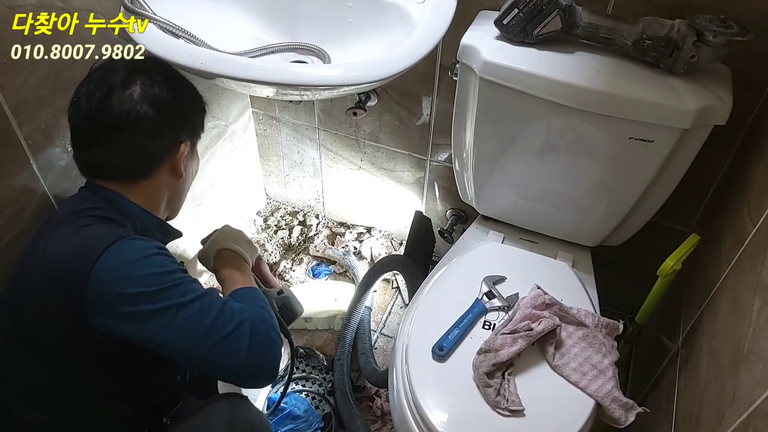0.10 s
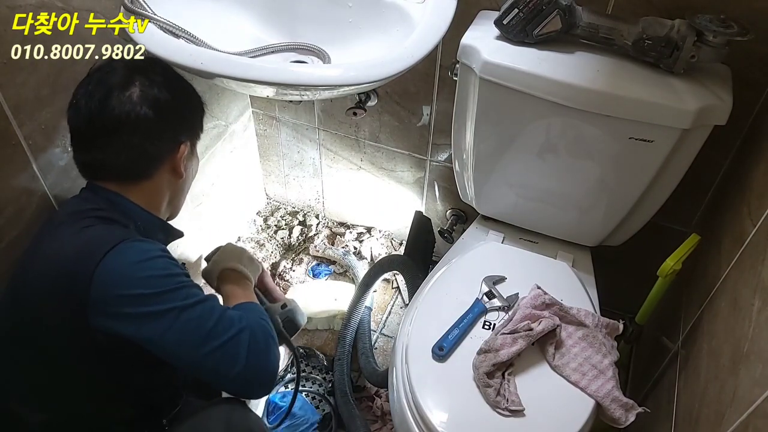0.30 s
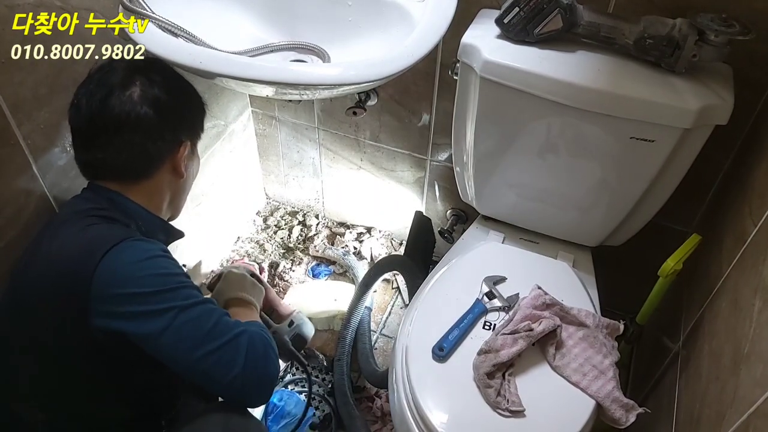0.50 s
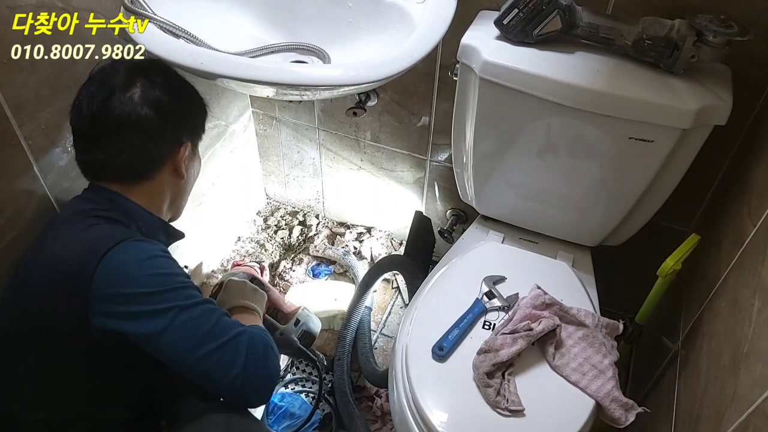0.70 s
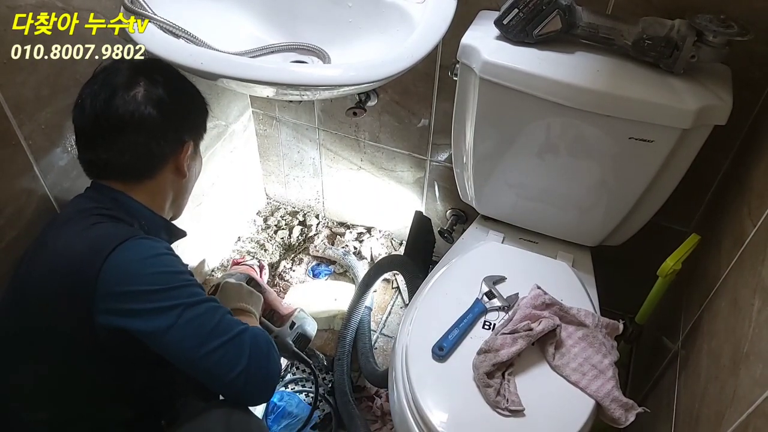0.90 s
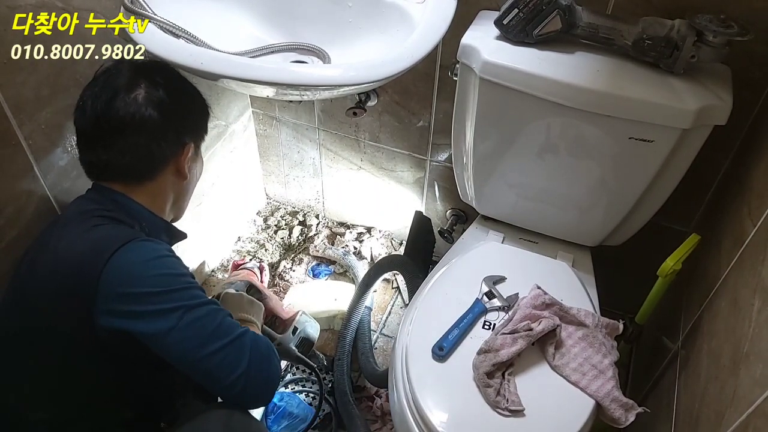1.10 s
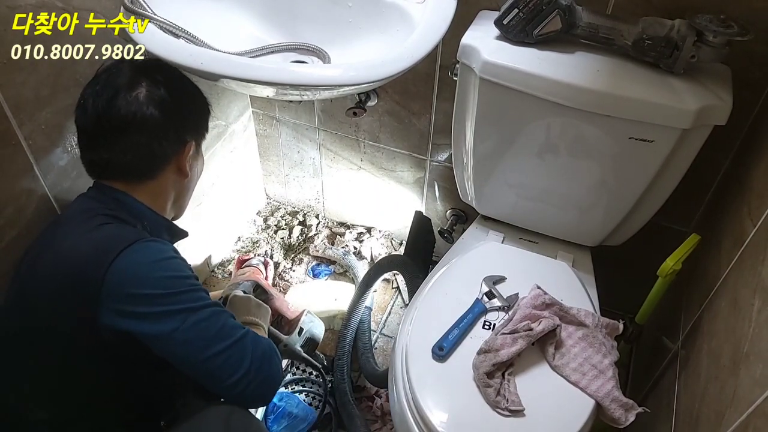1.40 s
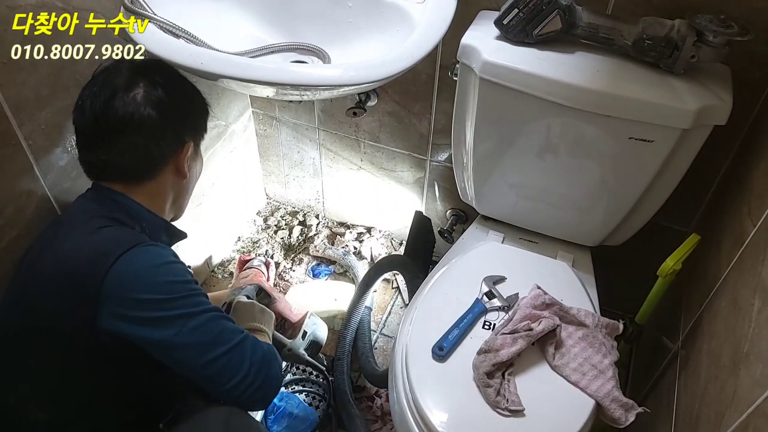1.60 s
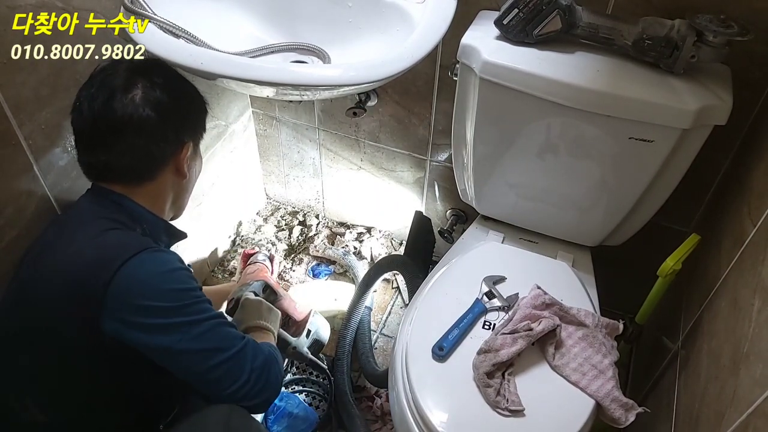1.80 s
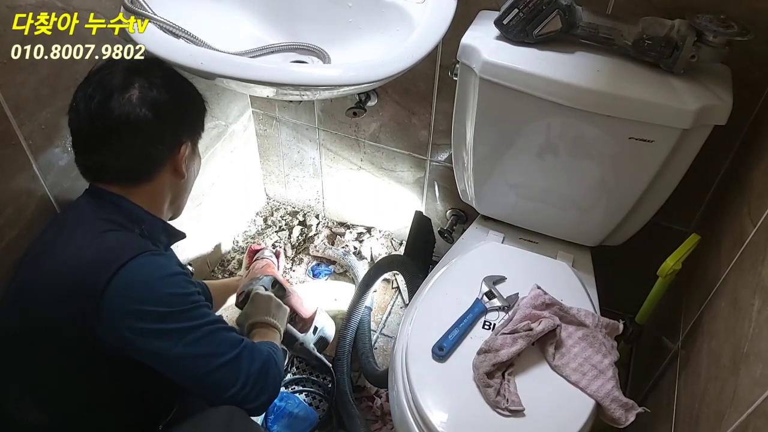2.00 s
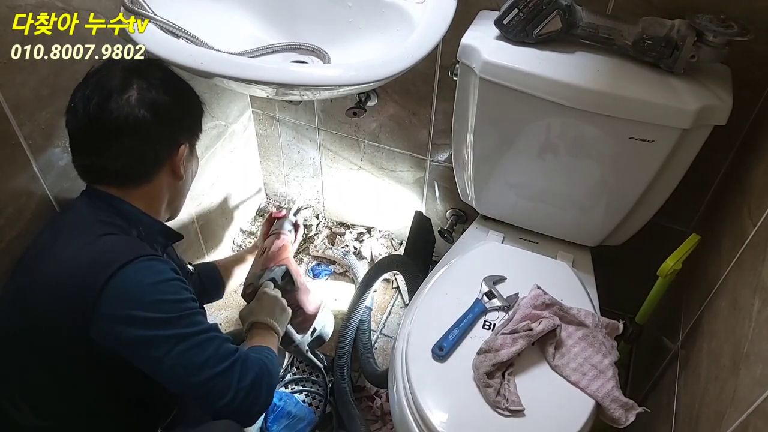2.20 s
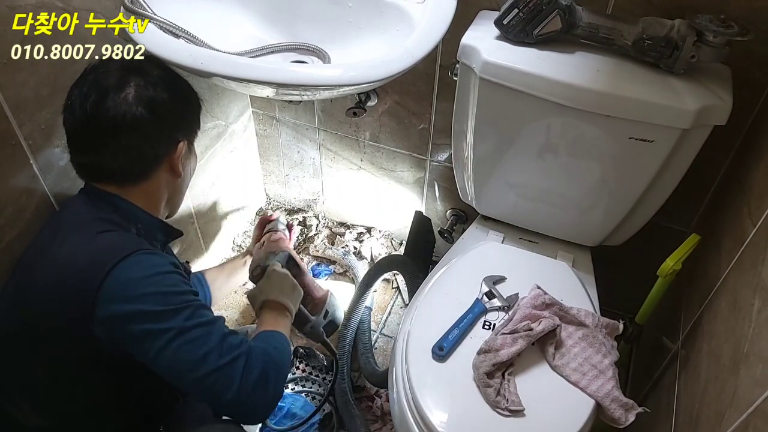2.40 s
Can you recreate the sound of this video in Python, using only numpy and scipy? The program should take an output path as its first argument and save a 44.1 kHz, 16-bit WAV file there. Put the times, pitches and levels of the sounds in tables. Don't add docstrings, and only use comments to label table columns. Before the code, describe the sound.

Electric chipping hammer in a small tiled bathroom: a brief motor whir, then rapid ringing steel blows crushing mortar for about two seconds, then the blows stop and the motor slows; close, loud, bright stereo pickup.

```python
import sys
import numpy as np
from scipy import signal
from scipy.io import wavfile
from scipy.ndimage import uniform_filter1d

SR = 44100
rng = np.random.default_rng(int(sys.argv[2]) if len(sys.argv) > 2 else 0)


def ratio_of_db(decibels):
    return 10 ** (np.asarray(decibels, float) / 20)


def unload_audio(sound):
    columns = np.transpose(np.atleast_2d(sound))
    steps = np.round(np.clip(columns, -1, 1) * 32767)
    wavfile.write(sys.argv[1], SR, steps.astype(np.int16))


N = 110250


def rms_one(x):
    return x / np.sqrt(np.mean(x ** 2) + 1e-20)


def noise():
    return rng.standard_normal((2, N))


def in_time(rows):
    s, *columns = np.transpose(rows)
    return [np.interp(np.arange(N) / SR, s, column) for column in columns]


def drift(rate):
    r = np.exp(-80 * np.pi * rate / SR)
    slow = signal.lfilter([1], [1, -2 * r, r * r], rng.standard_normal(N // 40 + 2002))
    slow = rms_one(slow[2000:])
    return np.interp(np.arange(N) / 40, np.arange(len(slow)), slow)


def rings(clicks, modes):
    out = 0
    for hz, db, t60 in modes:
        r = ratio_of_db(-60 / (t60 * SR))
        w = 2 * np.pi * hz / SR
        ring = signal.lfilter([1], [1, -2 * r * np.cos(w), r * r], clicks + 1e-18)
        out = out + ratio_of_db(db) * rms_one(ring)
    return out


def grains(per_s, spread_db):
    sizes = ratio_of_db(spread_db * np.minimum(rng.exponential(1, (2, N)), 5)) * noise()
    return rms_one(sizes * (rng.random((2, N)) < per_s / SR))


def coloured(source, spectrum, patchy_db, per_octave=3):
    hz, db = np.transpose(spectrum)
    edges = 30 * 2 ** np.arange(0, 9.2, 1 / per_octave)
    edges = edges[edges > hz[0] * .7]
    lumps_db = 1.5 * drift(9)
    out = 0
    for low, high in zip(edges, edges[1:]):
        band = signal.sosfilt(signal.butter(2, [low, high], "band", fs=SR, output="sos"), source)
        level_db = np.interp(np.log(low * high) / 2, np.log(hz), db)
        flicker_db = patchy_db * drift(38.0) + (high < 300) * lumps_db
        out = out + band * ratio_of_db(level_db + flicker_db)
        source = source[::-1] * [[1], [-1]]
    return rms_one(out)


def pulsing(swell, share, span):
    return 1 - share + share * swell / uniform_filter1d(swell, size=span)


# f/Hz, level/dB per Hz
MOTOR_RUSH = [(40, -25), (150, -17), (377, -27), (460, -6), (810, -9), (3550, -4), (8000, -19.5),
              (15500, -21)]
# t/s, f/Hz, hum level/dB, whine level/dB
ROTOR_SPEED = [
    (0, 471, -46, -50),
    (.22, 471, -46, -56),
    (.35, 440, -58, -60),
    (2.2, 530, -65, -52),
    (2.3, 495, -62, -39),
    (2.5, 375, -62, -38),
]
# f/Hz, level/dB, t60/s
CASING_MODE = [(820, 0, .2)]


def motor():
    rush_db, casing_db = -34.5, -47
    hz, hum_db, whine_db = in_time(ROTOR_SPEED)
    turn = 2 * np.pi * np.cumsum(hz * (1 + .004 * drift(15.0))) / SR
    tones = 0
    for multiple, db in ((1, hum_db), (4, whine_db)):
        sides = np.sin([multiple * turn, multiple * turn + 1.5])
        tones = tones + ratio_of_db(db + 3 * drift(20)) * sides
    rush = ratio_of_db(rush_db) * coloured(noise(), MOTOR_RUSH, patchy_db=3.0)
    return rush + tones + ratio_of_db(casing_db) * rings(noise(), CASING_MODE)


# t/s, ring level/dB
SHANK_BLOWS = [(0.175, -25.5), (0.213, -19.5), (0.2376, -22), (0.2625, -16.5), (0.288, -15), (0.3125, -11),
               (0.3363, -8.5), (0.3587, -15), (0.3805, -14), (0.395, -8), (0.428, -12.5), (0.461, -13),
               (0.4816, -11.5), (0.5075, -10.5), (0.533, -6), (0.591, -9), (0.629, -8), (0.667, -10),
               (0.7096, -19.5), (0.747, -9), (0.781, -10),
               (0.818, -7.5), (0.837, -12), (0.8505, -5), (0.8737, -11), (0.9035, -10), (0.9271, -12),
                (0.9665, -12), (0.996, -9.5), (1.0375, -14.5), (1.0856, -16), (1.123, -15.5), (1.162, -15),
                (1.176, -27), (1.202, -13), (1.2394, -14), (1.2633, -17), (1.283, -22), (1.3014, -15),
                (1.3356, -16), (1.3605, -11), (1.3766, -17.5), (1.402, -18), (1.434, -13), (1.478, -13),
                (1.5043, -15), (1.5347, -14.5),
               (1.57, -17), (1.5943, -15.5), (1.6344, -13.5), (1.6531, -57), (1.675, -17), (1.712, -19),
              (1.7317, -22), (1.747, -12), (1.7786, -12), (1.8007, -13), (1.821, -7), (1.859, -9.5),
              (1.8821, -7.5), (1.901, -19), (1.921, -2), (1.957, -11.5), (1.994, -11.5), (2.038, -13),
              (2.0734, -16.5), (2.101, -15.5), (2.1305, -13), (2.1575, -13), (2.188, -17), (2.215, -16.5),
              (2.2582, -47), (2.2892, -55)]


def all_blows():
    return SHANK_BLOWS


def blows(rise_s):
    s, db = np.transpose(all_blows())
    hits = np.zeros(N)
    hits[(s * SR).astype(int)] = ratio_of_db(db)
    r = np.exp(-1 / (rise_s * SR))
    peak_gain = np.e ** 2 * (1 - r) ** 2 / 2
    return abs(signal.lfilter([peak_gain], np.poly([r, r, r]), hits))


def steel(strikes, hz, wander_hz, rise_s, hold_s):
    lead_s, reset_s = .003, 0.00072
    s, db = np.transpose(sorted([(0, -80)] + strikes))
    t = np.arange(N) / SR + lead_s
    last = np.searchsorted(s, t, side="right") - 1
    age = t - s[last]
    start = ratio_of_db(db) * np.exp(2j * np.pi * rng.random(len(s)))
    swing = start[last] * (1 - np.exp(-age / rise_s)) * np.exp(-(age / hold_s) ** 2)
    r = np.exp(-1 / (reset_s * SR))
    swing = signal.lfilter([1 - r], [1, -r], swing)
    turn = 2 * np.pi * np.cumsum(hz + wander_hz * drift(31.8)) / SR
    apart = .72 + .22 * drift(20.0)
    ring = swing * np.exp(1j * np.array([turn + apart, turn - apart]))
    return np.sqrt(2) * ring.real


# t/s, ring level/dB
BENDING_BLOWS = [(0.4909, -31), (0.557, -34), (0.5901, -19), (0.6545, -30), (0.7064, -21.5), (0.7478, -17),
                 (0.8016, -13.5), (0.8445, -24), (0.872, -24), (0.8944, -20), (0.9274, -26), (0.9738, -14),
                 (1.0025, -9.5), (1.0296, -16), (1.0565, -12.5), (1.102, -13), (1.1239, -17), (1.163, -10),
                 (1.1992, -15), (1.2247, -15), (1.2581, -13), (1.2786, -20), (1.323, -33), (1.3479, -25),
                 (1.3858, -29), (1.4482, -35), (1.4756, -17), (1.5335, -21), (1.5639, -24), (1.5973, -10),
                 (1.6462, -26), (1.673, -15), (1.713, -11), (1.759, -11.5), (1.8039, -22), (1.8523, -28),
                 (1.8772, -20), (1.9081, -25), (1.9426, -33), (1.9695, -24), (2.0009, -26), (2.1087, -23),
                 (2.1635, -24), (2.197, -21), (2.2229, -28)]
# t/s, ring level/dB
TIP_SLIPS = [
    (1.395, -15),
    (1.995, -18),
    (2.02, -11),
]


def shank():
    rise_s, bend_hold_s, bend_wander_hz = 0.011, 0.018, 15.4
    lengthwise = steel(all_blows(), 11756, 9.7, rise_s, 0.019)
    bent = steel(BENDING_BLOWS, 9142, bend_wander_hz, 0.0033, bend_hold_s)
    slipping = steel(TIP_SLIPS, 11110, bend_wander_hz, rise_s, bend_hold_s)
    return ratio_of_db(4) * lengthwise + ratio_of_db(-1.5) * bent + slipping


# f/Hz, level/dB, t60/s
RATTLE_MODES = [(11750, 0, .03), (11400, -6, .03), (11120, -8, .05), (11550, -5, .012), (11950, -9, .012),
                (13800, -4, .015), (14000, -8, .008), (14300, -7, .008)]
# f/Hz, level/dB per Hz
STEEL_HASH = [(3000, -2.5), (6000, -8), (9000, 1), (11700, -10), (12500, 23), (13300, -34), (14000, -9),
              (15200, -26)]


def chatter():
    modes_db, hash_db, hash_follows = -29, -25.5, 0.45
    swell = rms_one(blows(rise_s=0.0099))
    clicks = grains(per_s=1700, spread_db=1.5)
    sizzle = swell ** hash_follows * (noise() + .7 * clicks)
    return (ratio_of_db(modes_db) * rings(swell * clicks, RATTLE_MODES)
            + ratio_of_db(hash_db) * coloured(sizzle, STEEL_HASH, patchy_db=3, per_octave=10))


# t/s, peak level/dB
TIP_BITES = [(0.2243, -29), (0.3395, -26), (0.3705, -19), (0.3955, -12), (0.4274, -10), (0.4547, -10),
             (0.4672, -11), (0.494, -7), (0.525, -7), (0.559, -4.5), (0.5905, -10), (0.6348, -13.5),
             (0.6649, -14.5), (0.7073, -6), (0.7416, -2.5), (0.771, -3), (0.797, -9.5), (0.8209, -12),
             (0.853, -18), (0.8957, -7), (0.9162, -19), (0.9366, -7), (0.9691, -10), (1.0213, -19),
             (1.0525, -15), (1.0853, -9.5), (1.1228, -5), (1.1621, -3), (1.1949, -2.5), (1.225, -4),
             (1.2507, -13), (1.2783, -13), (1.2993, -11), (1.31, -16), (1.3316, -4.5), (1.3792, -8),
             (1.4057, -14), (1.42, -18), (1.4435, -11), (1.4743, -6), (1.5036, -5), (1.5347, -6.5),
             (1.562, -4), (1.6026, -19), (1.6366, -25), (1.6717, -15), (1.711, -4), (1.7428, -9),
             (1.772, -4.5), (1.7895, -5), (1.816, -9), (1.8585, -27), (1.906, -15), (1.932, -8.5),
             (1.959, -4), (1.9758, -5), (2.0106, -9), (2.135, -22), (2.164, -28), (2.1978, -20.5)]


def bites(decay_s):
    s, db = np.transpose(TIP_BITES)
    hits = np.zeros(N)
    hits[(s * SR).astype(int)] = ratio_of_db(db)
    return signal.lfilter([1], [1, -np.exp(-1 / (decay_s * SR))], hits)


# t/s, level/dB
BODY_WEIGHT = [(0.0, -62), (0.17, -50), (0.21, -76), (0.28, -45), (0.49, -38.5), (0.72, -60), (0.74, -45.5),
               (0.86, -37), (1.16, -51), (1.28, -40.5), (1.33, -46.5), (1.48, -37.5), (1.66, -56),
               (1.73, -42.5), (2.03, -48.5), (2.07, -66), (2.11, -44), (2.5, -70)]
# f/Hz, level/dB per Hz
FLOOR_SHUDDER = [(40, -4), (70, -5.5), (150, -4), (280, -5), (420, -27), (1500, -70)]


def thud():
    db, = in_time(BODY_WEIGHT)
    swell = uniform_filter1d(bites(decay_s=0.027), size=300) + 1e-2
    push = pulsing(swell, share=0.44, span=5000)
    return ratio_of_db(db) * push * coloured(noise(), FLOOR_SHUDDER, patchy_db=2.5)


# f/Hz, level/dB per Hz
MORTAR = [(120, -40), (300, -16), (750, -13), (1200, -3), (2500, -1), (4500, -6.5), (8000, -10.5),
          (12500, -9), (14500, -28)]


def crushing(hiss, crush_db):
    crack = coloured(noise(), MORTAR, patchy_db=-5.0, per_octave=2)
    cracks = ratio_of_db(-11.5) * bites(decay_s=0.0022) * crack
    return cracks + ratio_of_db(crush_db + 2.5) * coloured(hiss, MORTAR, patchy_db=3.0)


def chips(beat):
    cycles = 30.3
    clicks = beat * grains(per_s=1500, spread_db=2.5)
    dealt = rng.integers(0, 24, (2, N))
    out = 0
    for k, hz in enumerate(np.geomspace(1050, 4800, num=24)):
        out = out + rings(clicks * (dealt == k), [(hz, 0, cycles / hz)])
    return rms_one(out)


# f/Hz, level/dB, t60/s
SLAB_MODES = [(1280, 5, 0.023), (1233, -18.5, 0.099), (1352, -7, 0.095)]
# f/Hz, level/dB, t60/s
TILE_MODES = [(2372, -1, 0.026), (3450, -0.5, 0.09), (3836, -4.5, 0.088), (2640, -1.5, 0.064)]


def slab_and_tile(hiss, grit, slab_db, crush_db):
    return ratio_of_db(slab_db - 2) * rings(hiss, SLAB_MODES) + ratio_of_db(crush_db - 11) * rings(grit, TILE_MODES)


# f/Hz, level/dB, t60/s
HIGH_BENDING = [(9140, 0, .1), (9200, -6, .02), (9300, -13, .01), (6620, -20, .05)]
# f/Hz, level/dB, t60/s
LOW_BENDING_MODES = [(5850, 0, .07), (5800, -6, .03), (6060, -10, .06)]
# t/s, level/dB
SIDE_LOAD = [(0.2, -54), (0.22, -43), (0.58, -33), (0.77, -39), (0.87, -26.5), (1.05, -34), (1.08, -52),
             (1.41, -36), (1.58, -27.5), (1.61, -50), (1.74, -27.5), (1.81, -45), (2.1, -34.5), (2.18, -53),
             (2.21, -37), (2.3, -58)]


def bending(grit, bend_db):
    low_db, = in_time(SIDE_LOAD)
    struck = np.clip(uniform_filter1d(blows(rise_s=.003), size=2000) * 50, 0, 1)
    return ratio_of_db(bend_db + 2) * struck * rings(grit, HIGH_BENDING) + ratio_of_db(low_db) * rings(grit, LOW_BENDING_MODES)


# t/s, crushing level/dB, slab boom level/dB, high bending ring level/dB
LEANING = [(0.0, -35.5, -57, -54), (0.1, -35.5, -57, -62), (0.38, -22.5, -39, -31), (0.55, -21, -29, -36),
           (0.71, -27.5, -43.5, -38), (0.83, -19, -26, -28), (1.16, -25, -55, -27.5), (1.29, -22, -22, -29),
           (1.31, -25, -24, -44), (1.45, -20, -40, -23.5), (1.49, -23, -33, -25), (1.75, -25, -33.5, -25.5),
           (1.87, -20.5, -26.5, -33), (1.99, -23.5, -22.5, -45), (2.04, -25.5, -62, -34),
           (2.22, -32, -45, -44), (2.31, -39, -55, -59), (2.5, -35.5, -43, -57)]


def floor_work():
    crush_db, slab_db, bend_db = in_time(LEANING)
    beat = pulsing(bites(decay_s=.012) + 1e-2, share=0.43, span=4000)
    grit = beat * grains(per_s=3000, spread_db=3.5)
    hiss = beat * noise() + .5 * grit
    bodies = (ratio_of_db(crush_db - 0.5) * chips(beat)
              + slab_and_tile(hiss, grit, slab_db, crush_db)
              + bending(grit, bend_db))
    no_boom = signal.butter(3, 665, "high", fs=SR, output="sos")
    return crushing(hiss, crush_db) + signal.sosfilt(no_boom, bodies)


def bathroom(x):
    t60_s, wall_cut_hz = .3, 12000
    out = np.zeros((2, N))
    dull = np.exp(-2 * np.pi * wall_cut_hz / SR)
    lags = (rng.uniform(.008, .025, size=16) * SR).astype(int)
    for k, lag in enumerate(lags):
        side = k % 2
        loop, state = x[side].copy(), [0.]
        gain = ratio_of_db(-60 * lag / SR / t60_s)
        for i in range(lag, N, lag):
            back, state = signal.lfilter([gain * (1 - dull)], [1, -dull], loop[i - lag:i], zi=state)
            loop[i:i + lag] += back[:N - i]
        out[side] += (loop - x[side]) * (-1) ** (k // 2) / 4
    return out


def scene():
    whir = motor()
    ring = shank()
    rest = chatter() + thud() + floor_work()
    echoes = ratio_of_db(-3) * bathroom(rest + ratio_of_db(-11) * ring)
    return whir + ring + rest + echoes


def roll_off(x):
    return signal.sosfilt(signal.butter(12, 15610, fs=SR, output="sos"), x)


def record(dry):
    top = 1.0
    mix = signal.sosfilt(signal.butter(2, 73, "high", fs=SR, output="sos"), dry)
    mix = top * np.tanh(mix / top)
    mix = signal.sosfilt(signal.cheby2(10, 60, 15500, fs=SR, output="sos"), mix)
    return roll_off(mix)


dry = scene()
out = record(dry)
unload_audio(out)
```